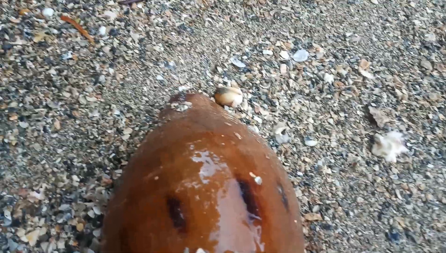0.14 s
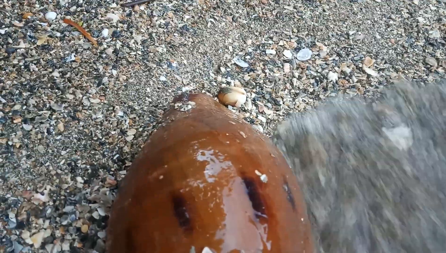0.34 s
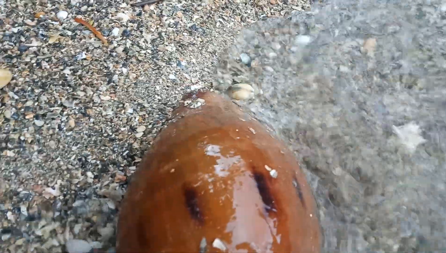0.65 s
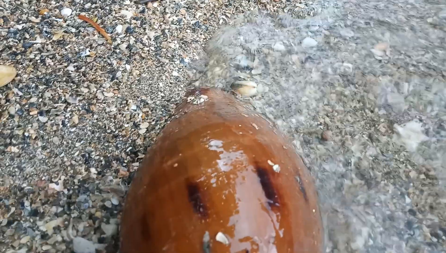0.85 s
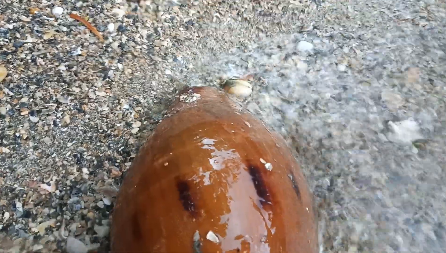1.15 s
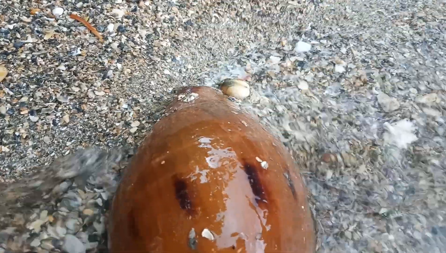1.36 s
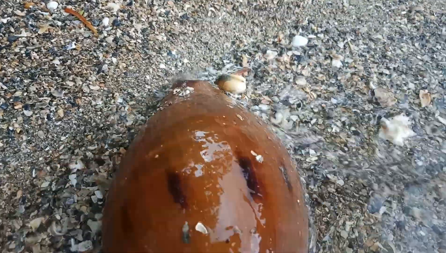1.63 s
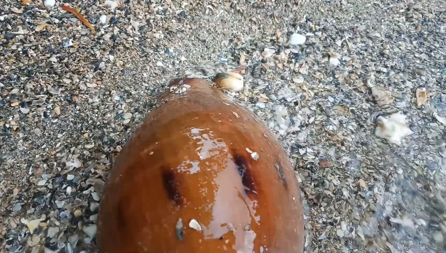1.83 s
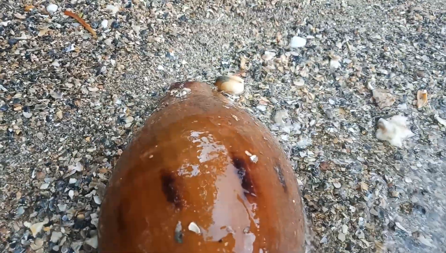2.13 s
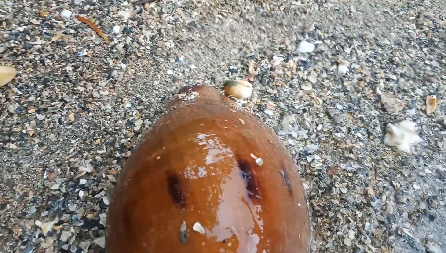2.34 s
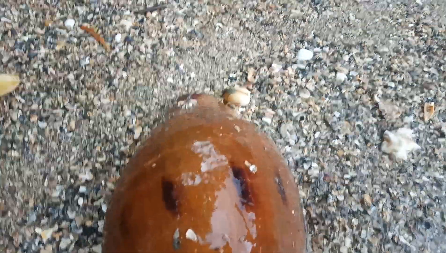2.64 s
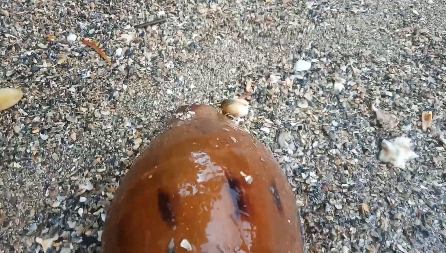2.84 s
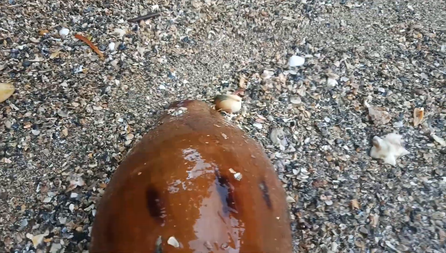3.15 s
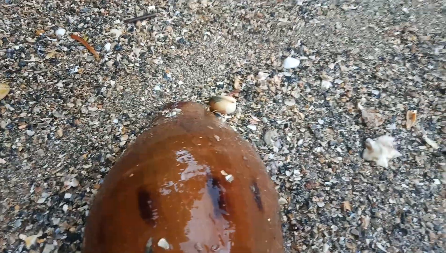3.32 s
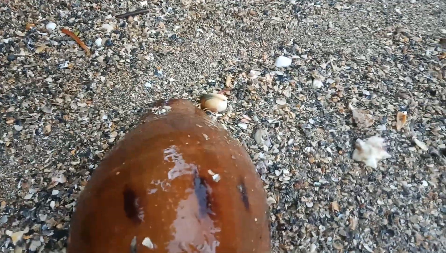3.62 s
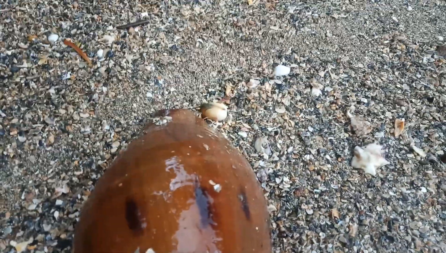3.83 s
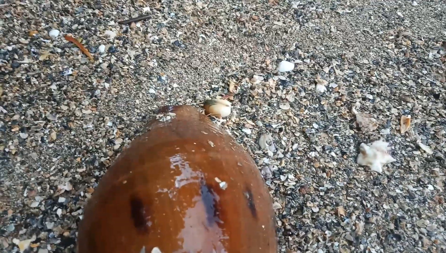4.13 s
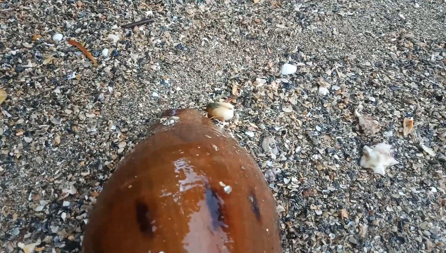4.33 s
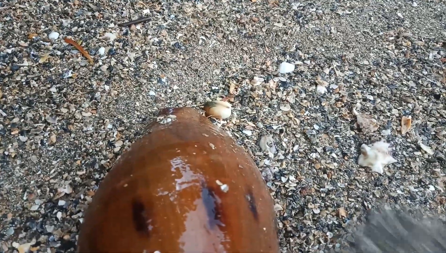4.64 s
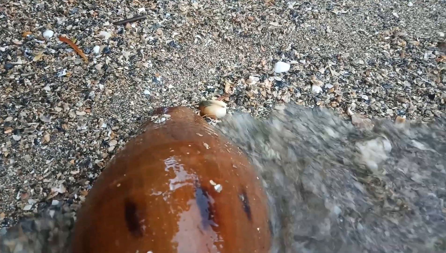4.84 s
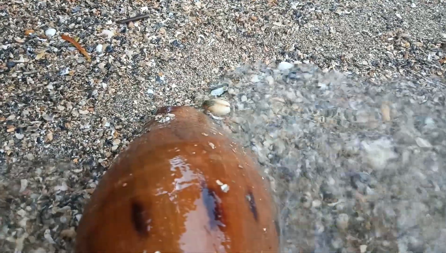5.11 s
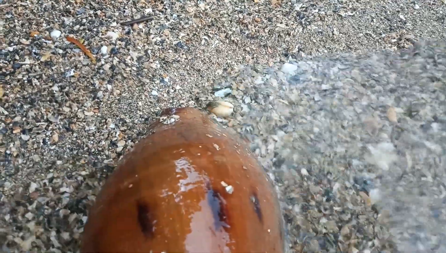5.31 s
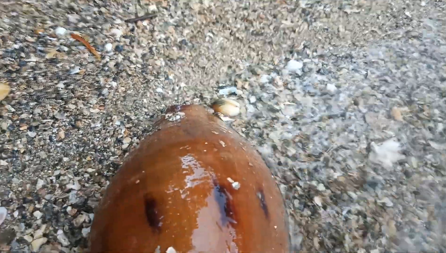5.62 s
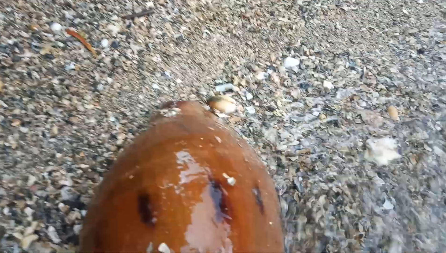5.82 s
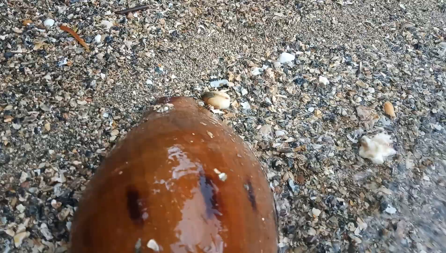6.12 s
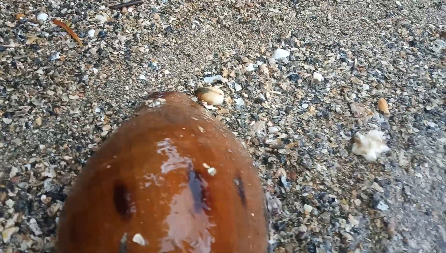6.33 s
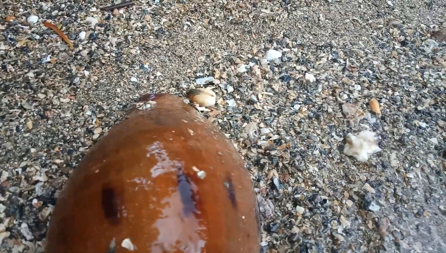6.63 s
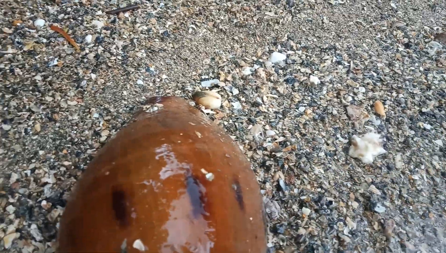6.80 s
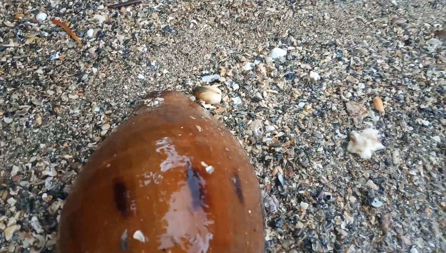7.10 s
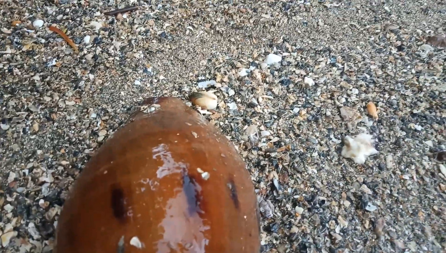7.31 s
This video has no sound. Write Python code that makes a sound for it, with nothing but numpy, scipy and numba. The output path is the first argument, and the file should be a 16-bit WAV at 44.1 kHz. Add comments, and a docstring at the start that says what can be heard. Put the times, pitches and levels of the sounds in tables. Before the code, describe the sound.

Small waves lap beside a microphone held low over shell grit. Foam hisses and crackles, trapped air gurgles and single bubbles pop with rising pitch. The opening slap gives way to gentle seeping, a bubbly splash breaks midway and drains, and after a quiet pause a louder, wetter rush closes the scene over soft low sea rumble.

```python
"""Foam fizzes and bubbles plop as small waves run up a beach of coarse sand and shell grit and drain back.
The microphone is close to the ground: trapped air gurgles, spray ticks on the grit, the sea rumbles softly behind.
Bubbles are dying sines of climbing pitch; splashes, spray and rumble are coloured noise under envelopes.
Each rush of water swells, holds and fades; gurgles keep times of their own."""
import sys
import numpy as np
from scipy import signal
from scipy.fft import rfft, irfft, next_fast_len
from scipy.io import wavfile
from numba import njit

SR = 44100
rng = np.random.default_rng(int(sys.argv[2]) if len(sys.argv) > 2 else 0)


def master_out(mix):
    """Clip the mix to full scale and print it as 16-bit PCM to the path in sys.argv[1]."""
    frames = np.transpose(np.atleast_2d(mix))
    ceiling = np.clip(frames, -1, 1)
    pcm = np.round(ceiling * 32767).astype(np.int16)
    wavfile.write(sys.argv[1], SR, pcm)


N = 328980

# Spectra, from the distant sea to the foam at hand, then the microphone's self-noise.
# Each row: frequency in Hz, relative level in dB per Hz.
RUMBLE_SPECTRUM = [(15, -33), (25, -14), (43, -18), (87, -4.5), (134, -1), (263, -4.5), (360, -2.5),
                   (400, -1.5), (520, -20), (880, -120)]
GURGLE_SPECTRUM = [(110, -48), (180, -18.5), (334, 2), (559, 7.5), (652, 2.5), (755, -7.5), (1400, 6.5),
                   (1820, -71), (3080, -120)]
SPRAY_SPECTRUM = [(3240, -26), (5500, -2), (5990, 1.5), (9790, -19), (14900, -8.5), (15600, -10),
                  (16000, -20)]
FOAM_SPECTRUM = [(410, -19.5), (700, -6.5), (762, -6.5), (934, -5), (1180, -8.5), (1720, 1), (3400, -1.5),
                 (4690, -16.5), (5510, -28.5), (9000, -58), (11700, -54), (19800, -120)]
MIC_HISS_SPECTRUM = [(2940, -31), (5000, 7), (6890, -5.5), (13100, -6), (14900, -2), (16000, -10)]

# Water slapping hollow in the sand.
# Each row: start in seconds, level before the swell in dB, pitch in Hz, time to die by 60 dB in seconds.
SLAPS = [(.064, -38, 236, .17), (.212, -33, 193, .11), (0.233, -28.5, 134, .11), (.394, -32, 116, .08),
         (2.795, -42, 241, .2), (2.81, -44, 165, .15), (3.857, -48, 184, .12), (4.03, -45.5, 129, .12),
         (4.478, -44, 185, .1), (7.239, -38.5, 261, .15), (7.259, -43, 131, .1)]
# Trapped air gurgling out as the water churns and drains.
# Each row: start, swell and hold in seconds, fade in dB per second, level in dB.
GURGLES = [(-.1, .1, .27, 140, -46), (.48, .14, .75, 90, -52.5), (1.53, .12, .38, 120, -53),
           (2.14, .1, .26, 60, -55), (2.8, .2, .12, 90, -53), (3.25, .4, .2, 80, -55),
           (3.93, .21, .06, 170, -30.5), (4.35, .1, .63, 45, -58), (5.6, .15, .25, 40, -56),
           (6.1, .17, .2, 40, -55), (6.42, .26, .27, 90, -31.5), (7.08, .1, .14, 150, -38)]
# Single bubbles that stand out close by.
# Each row: start in seconds, level before the swell in dB, starting pitch in Hz.
PLOPS = [(.0917, -15, 3120), (.152, -25.5, 1090), (.16, -26, 1630), (.211, -24, 527), (.224, -31, 466),
         (.246, -23, 700), (.2783, -25.5, 1460), (.2798, -16, 3000), (.3, -34, 830), (.442, -22.5, 1186),
         (.7582, -14, 3220), (.7582, -22, 1440), (.7582, -19, 2540), (.988, -27.5, 850),
         (1.0261, -21.5, 1990), (1.3453, -28, 2230), (1.5269, -29, 3480), (1.7025, -26.5, 2140),
         (2.322, -32.5, 1080), (2.4927, -26.5, 2350), (2.7397, -29.5, 1820), (3.3997, -27, 2330),
         (3.681, -25.5, 1310), (3.704, -28.5, 557), (3.714, -24.5, 2720), (3.772, -21.5, 780),
         (3.7733, -24, 3000), (3.789, -33, 428), (3.8297, -27, 1460), (3.8691, -17.5, 1690),
         (3.9709, -26, 1810), (3.9878, -22, 1980), (4.0297, -16, 2290), (4.0382, -16.5, 1670),
         (4.0507, -7.5, 3390), (4.059, -29, 416), (4.0731, -30, 5250), (4.0981, -20.5, 1860),
         (4.111, -24, 383), (4.143, -16, 410), (4.158, -20, 560), (4.189, -19, 1230), (4.209, -19, 1135),
         (4.215, -24, 380), (4.2892, -19, 2390), (4.293, -30.5, 550), (4.3565, -21.5, 2340),
         (4.428, -26, 1045), (4.4348, -20, 2640), (4.508, -33, 950), (4.5296, -23, 2410),
         (4.6159, -21.5, 2010), (4.657, -18.5, 970), (4.6778, -29, 1270), (4.6977, -28, 2760),
         (4.7601, -39, 6000), (4.781, -28, 3330), (4.8289, -23, 2950), (4.87, -30, 820),
         (4.904, -30.5, 774), (5.291, -42, 746), (5.455, -30, 467), (5.5548, -35.5, 2160),
         (5.661, -37, 850), (6.2302, -23.5, 2400), (6.265, -36, 520), (6.469, -37.5, 576),
         (6.4911, -20, 2750), (6.514, -37, 487), (6.556, -17, 1330), (6.6134, -13, 2400),
         (6.6518, -11, 3550), (6.639, -28, 330), (6.669, -27, 515), (6.733, -13, 764), (6.7625, -10, 2890),
         (6.776, -17.5, 313), (6.839, -21, 376), (6.867, -13, 740), (6.8738, -7, 2320), (6.898, -22, 930),
         (6.976, -22, 436), (7.019, -30, 705), (7.0259, -12, 1940), (7.0534, -9.5, 2320), (7.074, -32, 520),
         (7.105, -31, 500), (7.164, -20, 534), (7.1641, -14, 2500), (7.184, -22, 673), (7.194, -12.5, 680),
         (7.194, -2.5, 1540), (7.196, -14, 2250), (7.209, -22, 1280), (7.2244, -15, 1100),
         (7.234, -28, 300), (7.269, -29, 596), (7.303, -16, 414), (7.3158, -15, 2480), (7.319, -25, 407),
         (7.349, -24.5, 810), (7.419, -15.5, 1428), (7.4494, -23, 1340)]
# Splashes that crack broadband on the grit. Each row: start in seconds, level at the onset in dB.
CRACKS = [(.278, -33), (0.755, -30), (0.777, -33), (3.781, -26), (4.028, -29.5), (4.616, -41), (4.631, -39),
          (4.6578, -30), (6.651, -24), (6.881, -16), (7.051, -40), (7.193, -16.5), (7.209, -23),
          (7.257, -25), (7.3187, -21), (7.421, -29)]
# Spray drops hitting the grit.
# Each row: start in seconds, onset level of the lower treble in dB, onset level of the top in dB.
TICKS = [(0.767, -53, -72), (1.843, -60, -85), (1.912, -54, -78), (3.06, -63, -74), (3.3553, -62, -82),
         (3.76, -58, -72), (3.775, -58, -72), (3.98, -56, -66), (4.009, -53, -65), (4.075, -49, -61),
         (4.0974, -38.5, -57), (4.122, -50, -53), (4.1924, -47, -60), (4.393, -47, -51),
         (4.423, -41.5, -41), (4.507, -55, -56), (4.533, -48, -61), (4.6404, -51, -74), (4.702, -48, -68),
         (6.2048, -57, -63), (6.29, -63, -66), (6.4807, -51, -60), (6.56, -48, -64), (6.647, -39, -49),
         (6.8957, -43, -53), (6.934, -45, -52), (7.077, -54, -56), (7.167, -55, -54), (7.194, -44, -48),
         (7.256, -43, -56), (7.314, -54, -59)]
# Rushes of water up the beach.
# Each row: start, swell and hold in seconds, fade of the fizz in dB per second, levels of fizz, spray and
# rumble in dB, brightness in dB per octave, single near bubbles over the far hiss in dB.
WAVES = [(-.1, .1, .03, 24, -30, -65, -60, 3.5, -5.5), (.32, .55, .17, 27, -38, -74, -61, -1.5, -9),
         (1.42, .42, .19, 30, -39.5, -69, -68, 1.5, -4), (2.05, .2, .25, 35, -45, -80, -64, -0.5, -5),
         (2.62, .33, .1, 22, -44.5, -80, -70, -1.5, -11.5), (3.25, .45, .1, 36, -43, -77, -61, 0, -1),
         (3.89, .28, .05, 85, -29.5, -54, -56, -2, 2), (4.292, 0.12, 0.16, 18.5, -41.5, -67, -58, 4, 0),
         (5.48, .26, 0.28, 14, -41, -75, -66, .5, -6), (6.36, .32, .1, 46.5, -24.5, -49, -59, 4, -3),
         (6.65, .2, .12, 45, -24.5, -53, -59, -1, -3), (7.0, .19, 0.093, 70, -32.5, -60, -55, 1.5, -3)]

SURF_DB, SURF_LUMP_DB = -66, 1.5  # rumble between the rushes; spread of its lumps
TRICKLE_DB = -65  # gurgle that never stops
PLOP_CYCLES, PLOP_CYCLES_POWER = 29.2, 0.23  # cycles to die by 60 dB at 1 kHz; small bubbles ring more cycles
PLOP_RISE, PLOP_RISE_POWER = 0.012, -0.88  # pitch rise per cycle at 1 kHz; big bubbles climb faster
CRACK_S, CRACKLE_S, TICK_S = 0.0044, 0.0025, 0.0046  # seconds for a burst to fall to 1/e
CRACKLE_PER_S, CRACKLE_DB, CRACKLE_UNEVEN_DB = 40, -1.5, 3.0  # small splashes: rate, offset, unevenness
FOAM_HZ = 2400  # pitch about which the brightness tilts
SWELL_POWER = 1.6  # how slowly a swell sets in
SPRAY_FADE = 0.8  # fade speed as a multiple of that of the fizz
MIC_HISS_DB, CUTOFF_HZ = -75.5, 15780
CONTROL_STEP = 32  # samples between the points of a level curve


def from_db(db):
    """Gain of a level in dB."""
    return 10 ** (np.asarray(db) / 20)


def rms_one(x):
    """Scaled to an rms of 1."""
    return x / np.sqrt(np.mean(x ** 2) + 1e-20)


def at_hz(points, hz):
    """A spectrum table read on a log-frequency axis, far down outside it."""
    table_hz, table_db = np.array(points).T
    return np.interp(np.log(hz), np.log(table_hz), table_db, left=-90, right=-90)


def drift(rate):
    """Slow chance of spread 1 that turns about rate times a second."""
    # smoothed noise at one value per 20 samples, with the settling time dropped
    pole = np.exp(-40 * np.pi * rate / SR)
    noise = rng.standard_normal(N // 20 + 2002)
    slow = signal.lfilter([1], [1, -2 * pole, pole * pole], noise)[2000:]
    return np.interp(np.arange(N) / 20, np.arange(len(slow)), rms_one(slow))


def coloured(x, spectrum):
    """A signal given the shape of a spectrum table."""
    size = next_fast_len(N)
    hz = np.maximum(np.arange(size // 2 + 1) * SR / size, 1)
    return irfft(rfft(x, size) * from_db(at_hz(spectrum, hz)), size)[:N]


def gated(envelope, spectrum):
    """White noise under an envelope, then coloured; a unit envelope gives rms 1."""
    white = rng.standard_normal(N)
    return coloured(white * envelope, spectrum) / np.std(coloured(white, spectrum))


def bursts(events):
    """Envelope of sudden bursts that die away, from rows of start, level and length."""
    envelope = np.zeros(N)
    for start_s, db, length_s in events:
        first = round(start_s * SR)
        age = np.arange(min(N - first, 2500)) / SR
        envelope[first:][:len(age)] += from_db(db) * np.exp(-age / max(length_s, 3e-4))
    return envelope


def mix(near_db, near, far):
    """Near and far sound in the given ratio at constant power."""
    return (from_db(near_db) * near + far) / np.sqrt(1 + from_db(2 * near_db))


@njit
def sing(size, start, height, step, cycles, rise, swell):
    """Bubbles as sines that swell for some cycles and die; the pitch climbs as each one nears the surface."""
    out = np.zeros(size)
    for k in range(len(start)):
        phase, w, a, shut = 0.0, step[k], height[k], 1.0  # w is in cycles per sample
        for i in range(start[k], min(size, start[k] + int(cycles[k] / step[k]))):
            out[i] += a * (1 - shut) * np.sin(2 * np.pi * phase)
            phase += w
            w *= 1 + rise[k] * w
            a *= np.exp(-np.log(1000) * step[k] / cycles[k])
            shut *= np.exp(-step[k] / swell)
    return out


def swarm(spectrum, bright, per_s, cycles, rise, swell, uneven_db, clump_db, clump_rate):
    """Bubbles born at random in clumps, of uneven size, pitches spread over the spectrum; rms 1."""
    when, pick, pitch, size, life = rng.random((60000, 5)).T
    start = (when * N).astype(np.int64)
    clumps = from_db(clump_db * drift(clump_rate))
    born = pick < per_s * N / SR / len(pick) * clumps[start]
    low_hz, high_hz = spectrum[0][0], spectrum[-1][0]
    hz = low_hz * (high_hz / low_hz) ** pitch
    # a ring's energy lasts cycles / hz and a log slice is hz wide, so height grows with hz
    height = hz * from_db(at_hz(spectrum, hz) - uneven_db * np.log(np.maximum(size, .04)))
    height = height * from_db(bright[start] * np.log2(hz / FOAM_HZ))
    lives = cycles * (.5 + life)
    return rms_one(sing(N, start[born], height[born], hz[born] / SR, lives[born], rise * life[born], swell))


def patchy(spectrum, bright, patchy_db, rate):
    """Noise in third-octave bands, each wavering on its own and a little together; rms 1."""
    size = next_fast_len(N)
    shaped = rfft(coloured(rng.standard_normal(N), spectrum), size)
    octave = np.log2(np.maximum(np.arange(len(shaped)) * SR / size, 1) / FOAM_HZ)
    out, together = 0, drift(rate)
    for centre in np.arange(-7, 7) / 3:  # octaves from FOAM_HZ
        # neighbouring bands cross over smoothly
        window = np.cos(np.pi / 2 * np.clip(3 * (octave - centre), -1, 1)) ** 2
        band = irfft(shaped * window, size)[:N]
        waver_db = patchy_db * (drift(rate) + .5 * together)
        out = out + band * from_db(bright * centre + waver_db)
    return rms_one(out)


def surf(rumble_db):
    """Low noise of the sea behind the beach, a little lumpy."""
    lumps = from_db(SURF_LUMP_DB * drift(10))
    return from_db(rumble_db) * gated(lumps, RUMBLE_SPECTRUM)


def slaps():
    """Dull low thuds in the sand: a short ring without pitch rise."""
    start_s, db, hz, t60_s = np.transpose(SLAPS)
    start = (start_s * SR).astype(np.int64)
    return sing(N, start, from_db(db), hz / SR, np.maximum(t60_s * hz, 2), 0 * hz, 0.46)


def gurgle(near_db):
    """Trapped air: sparse large bubbles in churning noise."""
    bubbles = swarm(GURGLE_SPECTRUM, np.zeros(N), per_s=220, cycles=29.6, rise=0.0222, swell=1.0,
                    uneven_db=4.5, clump_db=3.0, clump_rate=10)
    return mix(near_db + 5.0, bubbles, gated(0.96, GURGLE_SPECTRUM))


def spray(spray_db, near_db):
    """Fine drops on the grit: hiss, tiny ringing droplets and the louder ticks."""
    drops = swarm(SPRAY_SPECTRUM, np.zeros(N), per_s=700, cycles=55.0, rise=.002, swell=.7,
                  uneven_db=5.5, clump_db=3.5, clump_rate=31)
    hiss = gated(from_db(2.1 * drift(25)), SPRAY_SPECTRUM)
    bed = mix(near_db + 2.5, drops, hiss)
    # each tick shares its strength between the two ends of the treble in its own way
    low = [(hz, db - 60 * (hz > 11000)) for hz, db in SPRAY_SPECTRUM]
    high = [(hz, db - 60 * (hz < 9000)) for hz, db in SPRAY_SPECTRUM]
    dull = gated(bursts([(s, low_db, TICK_S) for s, low_db, top_db in TICKS]), low)
    sharp = gated(bursts([(s, top_db, TICK_S) for s, low_db, top_db in TICKS]), high)
    return from_db(spray_db) * bed + dull + sharp


def scattered(x, wet_db, spread_s):
    """Ripples and shells nearby return a short cloud of weak echoes."""
    lag = np.arange(1300) / SR
    cloud = rng.standard_normal(len(lag)) * lag * np.exp(-lag / spread_s)
    echoes = signal.fftconvolve(x, cloud / np.linalg.norm(cloud))[:N]
    return x + from_db(wet_db) * echoes


def cracks(fizz_db, near_db):
    """Splashes: short bursts with the colour of the foam; small ones come at random, louder in near water."""
    when, pick, size = rng.random((1000, 3)).T
    i = (when * N).astype(int)
    uneven_db = CRACKLE_UNEVEN_DB * np.log(np.maximum(size, .05))
    small_db = fizz_db[i] + near_db[i] + CRACKLE_DB - uneven_db
    chance = CRACKLE_PER_S * N / SR / len(i)
    small = [(k / SR, db, CRACKLE_S) for k, db, p in zip(i, small_db, pick) if p < chance]
    large = [(s, db, CRACK_S) for s, db in CRACKS]
    return gated(bursts(large + small), FOAM_SPECTRUM)


def plops():
    """The single bubbles close by, each at its own pitch."""
    start_s, db, hz = np.transpose(PLOPS)
    khz = hz / 1000
    cycles = PLOP_CYCLES * khz ** PLOP_CYCLES_POWER
    rise = PLOP_RISE * khz ** PLOP_RISE_POWER
    return sing(N, (start_s * SR).astype(np.int64), from_db(db), hz / SR, cycles, rise, 1.25)


def fizz(near_db, bright):
    """Foam: small near bubbles over the hiss of countless far ones."""
    bubbles = swarm(FOAM_SPECTRUM, bright, per_s=900, cycles=46.0, rise=0.0053, swell=0.64,
                    uneven_db=4.0, clump_db=4.0, clump_rate=18)
    return mix(near_db, bubbles, patchy(FOAM_SPECTRUM, bright, patchy_db=1.87, rate=9.1))


def rushes(rows, level_db, fade_speed):
    """Power of every row in time: it swells, holds and fades."""
    start, swell, hold, fade = np.transpose(rows)[:4, :, None]
    age = np.arange(0, N, CONTROL_STEP) / SR - start
    ramp = np.clip(age / swell, 1e-4, 1) ** SWELL_POWER
    faded_db = fade_speed * fade * np.maximum(age - swell - hold, 0)
    return (ramp * from_db(level_db[:, None] - faded_db)) ** 2


def wash():
    """Powers of the rushes add up; brightness and nearness are averages weighted by each wave's fizz power."""
    fizz_db, spray_db, rumble_db, bright, near_db = np.transpose(WAVES)[4:]
    foam = rushes(WAVES, fizz_db, 1)
    foam_sum = foam.sum(axis=0)
    churn = rushes(GURGLES, np.transpose(GURGLES)[4], 1).sum(axis=0) + from_db(2 * TRICKLE_DB)
    mist = rushes(WAVES, spray_db, SPRAY_FADE).sum(axis=0)
    surge = rushes(WAVES, rumble_db, 1).sum(axis=0) + from_db(2 * SURF_DB)
    levels = [10 * np.log10(power) for power in (foam_sum, churn, mist, surge)]
    blends = [setting @ (foam / foam_sum) for setting in (bright, near_db)]
    return [np.interp(np.arange(N), np.arange(0, N, CONTROL_STEP), curve) for curve in levels + blends]


def scene():
    """All the water at one point; echoes from the ground follow only the plops and cracks."""
    fizz_db, gurgle_db, spray_db, rumble_db, bright, near_db = wash()
    foam = from_db(fizz_db) * fizz(near_db, bright)
    trapped_air = from_db(gurgle_db) * gurgle(near_db)
    water = foam + trapped_air + spray(spray_db, near_db)
    hits = scattered(plops() + cracks(fizz_db, near_db), wet_db=-8.5, spread_s=0.005)
    return (water + hits + slaps() + surf(rumble_db))[None]


def record(dry):
    """The microphone adds its own hiss and loses the deep bass; the top is cut steeply."""
    hiss = from_db(MIC_HISS_DB) * gated(1.0, MIC_HISS_SPECTRUM)
    bass_cut = signal.butter(2, 50, "high", fs=SR, output="sos")
    top_cut = signal.ellip(12, .5, 70, CUTOFF_HZ, fs=SR, output="sos")
    thin = signal.sosfilt(bass_cut, dry + hiss)
    return signal.sosfilt(top_cut, thin)


dry = scene()
out = record(dry)
master_out(out)
```